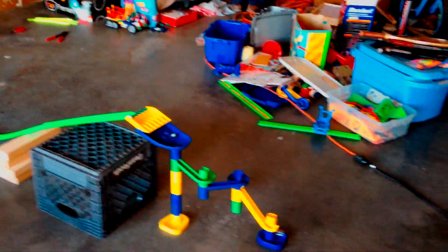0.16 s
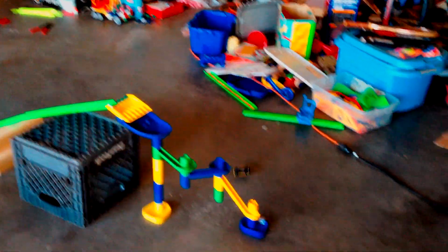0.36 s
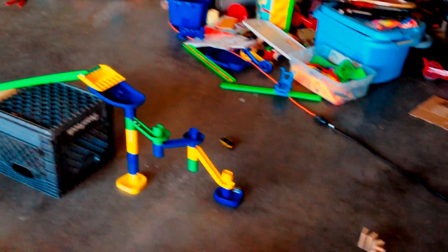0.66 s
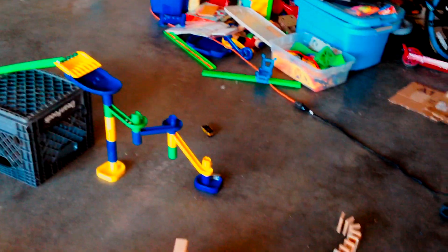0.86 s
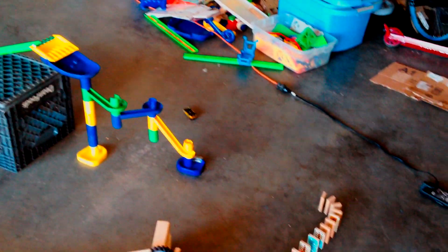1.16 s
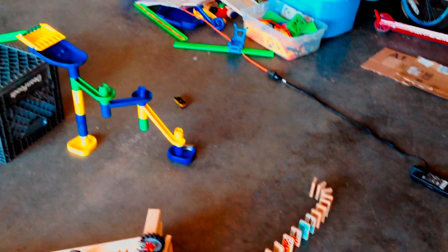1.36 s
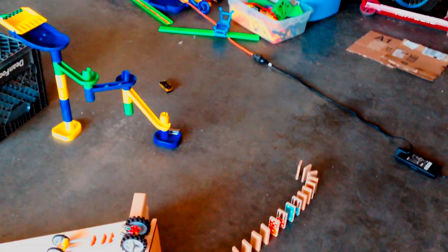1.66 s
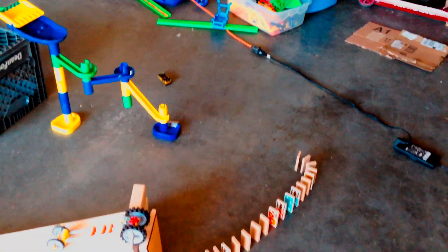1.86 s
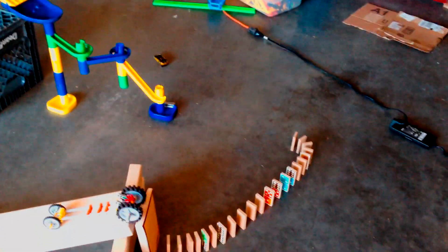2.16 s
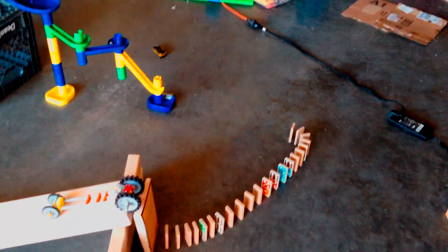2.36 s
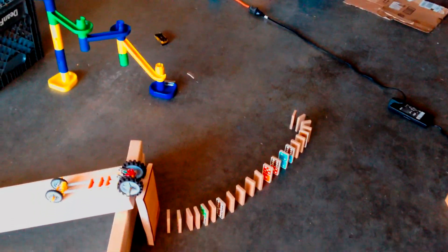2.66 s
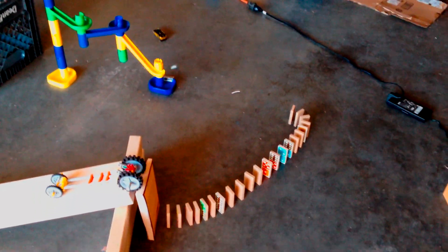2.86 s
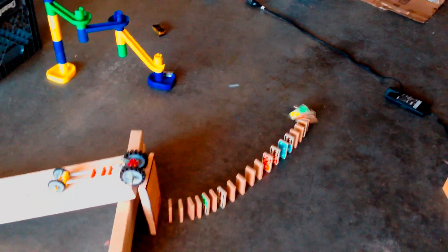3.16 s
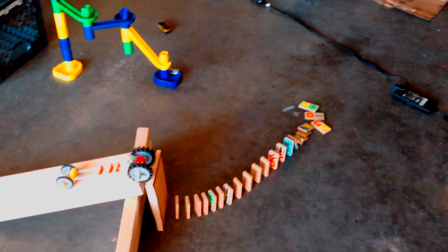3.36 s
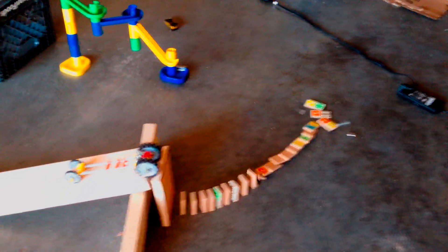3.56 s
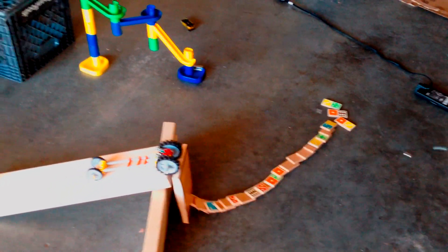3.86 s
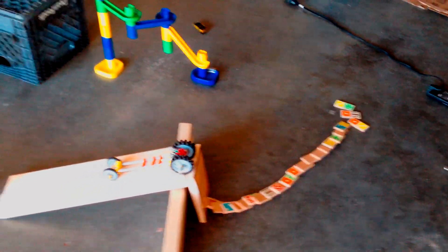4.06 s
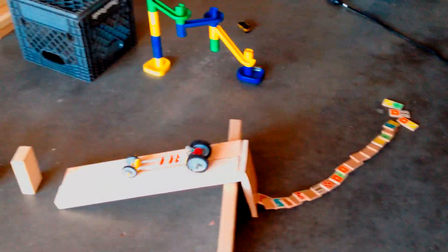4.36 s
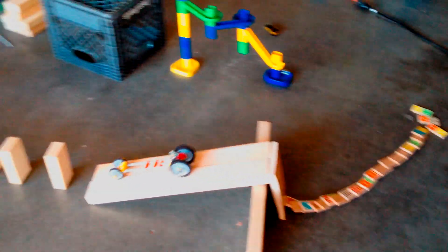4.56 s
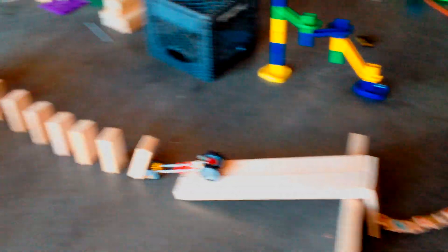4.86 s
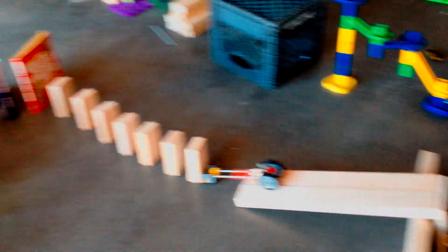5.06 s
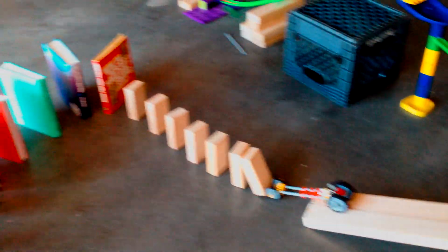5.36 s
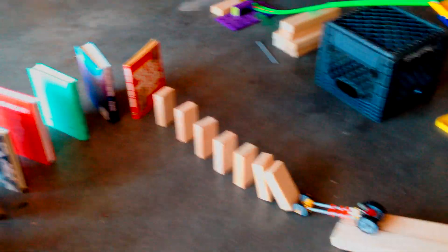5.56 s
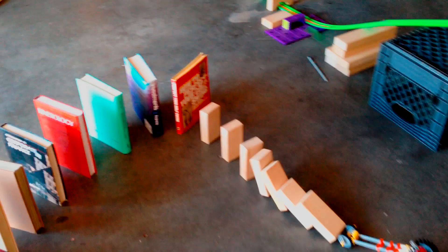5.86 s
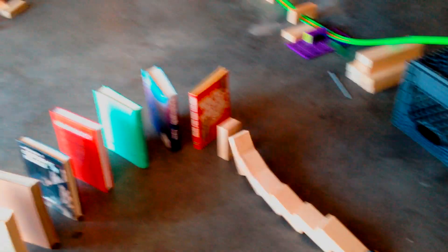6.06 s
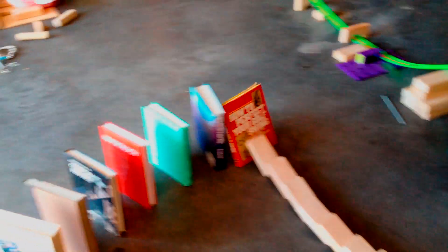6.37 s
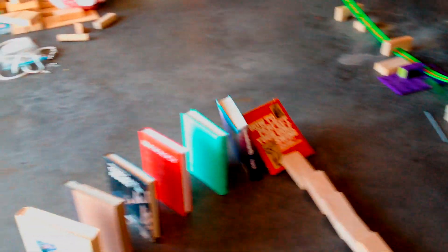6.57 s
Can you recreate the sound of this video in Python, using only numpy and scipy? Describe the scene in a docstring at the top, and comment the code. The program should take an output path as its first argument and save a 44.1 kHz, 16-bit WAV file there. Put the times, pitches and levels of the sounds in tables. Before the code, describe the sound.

A toy chain reaction on a concrete garage floor: marbles rattle in plastic, hit the floor with hard ticks, and dominoes fall in a crisp slithering cascade. After a sparse pause with a few cart knocks and faint rolling, wooden blocks topple with dry, loud clacks that bunch together, ending in a low hollow book thump. Handheld phone, slightly dull top, short room reverberation and faint steady hiss.

```python
"""Glass marbles drop and roll through a plastic run, starting a toy chain reaction in a garage: dominoes topple,
a cart rolls down a plank, wooden blocks and a book fall over, and a prop and loose parts knock.
Each thing is a set of resonances, struck by single blows and, except the prop and loose parts,
also driven by a random rattle of small contacts. Decaying noise bands give the echoes of the garage;
shaped noise gives its steady hush. A phone thins the bass and cuts the top."""
import sys
import numpy as np
from scipy import signal
from scipy.fft import rfft, irfft
from scipy.io import wavfile

SR = 44100
rng = np.random.default_rng(int(sys.argv[2]) if len(sys.argv) > 2 else 0)


def master_out(mix):
    """Clip the mix to full scale and print it as 16-bit PCM to the path in sys.argv[1]."""
    frames = np.transpose(np.atleast_2d(mix))
    ceiling = np.clip(frames, -1, 1)
    pcm = np.round(ceiling * 32767).astype(np.int16)
    wavfile.write(sys.argv[1], SR, pcm)


def ratio(d):
    """dB to gain"""
    e = np.asarray(d, float) / 20
    return 10 ** e


N = 296793  # samples
TIME = np.arange(N) / SR  # s


def split(rows, s):
    """Events in sequence: the rows before a moment, and those from it on."""
    before = [row for row in rows if row[0] < s]
    after = [row for row in rows if row[0] >= s]
    return before, after


def tilt(hz, hard_db):
    """Contact stiffness: harder contacts favour the high resonances; below 1 kHz the tilt is flat."""
    octaves = np.log2(np.maximum(hz, 1000) / 2000)
    return ratio(hard_db * octaves)


def walk(t, knots_per_s=6):
    """Slow random modulation: straight lines between normal draws, spread near 1."""
    knots = np.arange(t[0], t[-1] + 1, 1 / knots_per_s)
    return np.interp(t, knots, rng.standard_normal(len(knots)))


def resonate(push, t, hz, width):
    """Heterodyned resonance: shift down, smooth, shift back; pitch and strength drift with the contact point."""
    wander_share, wander_db = .012, 2.5  # spread of the pitch as a share, and of the strength
    r = np.exp(-np.pi * width / SR)
    turn = 2 * np.pi * hz / SR  # radians per sample
    spin = np.exp(1j * turn * np.cumsum(1 + wander_share * walk(t)))
    edges = signal.lfilter([1, 0, -1], [1], push)
    held = signal.lfilter([1], [1, -r], edges / spin)
    ring = np.imag(held * spin * np.exp(1j * turn)) / np.sin(turn)
    return ratio(wander_db * walk(t)) * (1 - r) * ring


def add(out, s, modes, peak_db, hard_db, crack_db):
    """Impulse response: trios of close rings swell during the contact and beat as they die, under a short crack."""
    contact_s, crack_s = .0008, .001
    hz, width, db = np.repeat(modes, 3, axis=0).T[:, :, None]
    t = TIME[:int(3 * SR / width.min())]  # until the narrowest ring has died
    spot = rng.standard_normal((3,) + hz.shape)  # no two blows land on the same spot
    hz = hz * np.exp(0.38 * width / (hz + width) * spot[0])
    size = ratio(db + 2 * spot[1]) * width * tilt(hz, hard_db)
    rings = size * np.exp(-np.pi * width * t) * np.sin(2 * np.pi * hz * t + .8 * spot[2])
    ring = rings.sum(axis=0) * (1 - np.exp(-(t / contact_s) ** 2))
    noise = np.resize(rng.standard_normal(1024), len(t) + 1)
    crack = np.diff(noise) * np.exp(-t / crack_s)
    crack_gain = ratio(crack_db + hard_db) * 3
    blow = ring / np.abs(ring).max() + crack_gain * crack / np.abs(crack).max()
    part = out[int(s * SR):][:len(t)]  # a view, so out itself grows
    part += ratio(peak_db) / np.abs(blow).max() * blow[:len(part)]


def blows(rows, modes, crack_db, main_hz=None):
    """Scaling of modes: one kind of object is struck, and each piece shifts the resonances with its size."""
    out = np.zeros(N)
    for s, peak_db, hard_db, *ring_hz in rows:
        shift = ring_hz[0] / main_hz if ring_hz else 1
        add(out, s, np.array(modes) * [shift, 1, 1], peak_db, hard_db, crack_db)
    return out


def rattle(spells, modes, per_s, spread_db, fade_db_per_s):
    """Random excitation of resonances by many faint and a few strong contacts; spells add as powers."""
    rise_db = 27.5  # the level climbs by this much during the rise
    lumps_per_s, lump_db = 45, 2  # contacts come in uneven bunches
    s, rise, hold, db, hard_db = np.transpose(spells)[:, :, None]
    start = int(max(s.min() - .2, 0) * SR)
    end = int((s + hold).max() * SR + .3 * SR)
    span = slice(start, end)
    t = TIME[span]
    grid = t[::32]  # coarse times for the slow envelopes
    rise_loss = rise_db * np.maximum(s - grid, 0) / np.maximum(rise, .001)
    fade_loss = fade_db_per_s * np.maximum(grid - s - hold, 0)
    shape = ratio(db - rise_loss - fade_loss)

    luck = rng.random((2, N))[:, span]
    touch = np.clip((per_s - luck[0] * SR) / 20, 0, 1)
    strength = np.minimum(-np.log(1 - luck[1]), 3)
    force = touch * ratio(spread_db * strength + lump_db * walk(t, lumps_per_s))
    parts = []
    for hz, width, mode_db in modes:
        push = force * rng.uniform(-0.81, 1, len(t))
        parts.append(ratio(mode_db) * resonate(push, t, hz, width))

    mix = 0
    for part, mode in zip(parts, modes):
        power = np.sum((shape * tilt(mode[0], hard_db)) ** 2, axis=0)
        mix = mix + part * np.interp(t, grid, np.sqrt(power))
    out = np.zeros(N)
    out[span] = mix / np.std(sum(parts))
    return out


def level(x, db):
    """Root-mean-square scaling to a level in dB."""
    return x * ratio(db) / np.sqrt(np.mean(x ** 2))


def air():
    """Stationary coloured noise: the steady hush of the room and the microphone."""
    # spectrum of the hush: (frequency [Hz], relative density [dB per Hz])
    hush = [(25, -39), (80, 4), (170, 2), (300, -4), (700, -2.5), (1200, -7.5), (3000, -18), (9500, -21)]
    hz, db = np.transpose(hush)
    bins = np.maximum(np.fft.rfftfreq(N, 1 / SR), 1)
    gain = ratio(np.interp(np.log(bins), np.log(hz), db))
    noise = irfft(rfft(rng.standard_normal(N)) * gain, N)
    return level(noise, -58.5)


def garage(x):
    """Diffuse reverberation: dense echoes from concrete and clutter, each octave dying at its own pace."""
    wet_db, wall_gap_s = -5.5, .003
    # reverberation times: (octave centre [Hz], time to fall 60 dB [s])
    decays = [(125, 0.14), (250, 0.56), (500, 0.34), (1000, 0.43), (2000, 0.4), (4000, 0.28), (8000, 0.28)]
    t = TIME[:SR]
    echo = 0
    for hz, t60 in decays:
        edges = [hz / np.sqrt(2), hz * np.sqrt(2)]
        band = signal.butter(2, edges, "bandpass", fs=SR, output="sos")
        echo = echo + signal.sosfilt(band, rng.standard_normal(len(t))) * ratio(-60 * t / t60)
    echo = echo * (1 - np.exp(-(t / wall_gap_s) ** 2))  # walls answer after a short gap
    echo = ratio(wet_db) * echo / np.sqrt(np.sum(echo ** 2))
    return x + signal.fftconvolve(x, echo)[:N]


def knocks():
    """Free vibration after impact: the hollow knock of the prop on the floor and tiny ticks of loose parts."""
    # ticks: (time [s], peak [dB], hardness [dB per octave], main ring [Hz])
    tick_blows = [(4.515, -32.5, 9, 4000), (4.615, -35, -1, 4550), (4.7572, -12, 19, 3800),
                  (6.33, -33, 18.5, 4100), (6.342, -33, 12, 4300), (6.483, -36.5, -15, 3900)]
    # resonances of loose parts, then of the prop: (frequency [Hz], width [Hz], strength [dB])
    tick_modes = [(2010, 120, -15), (4000, 490, 3.5), (6900, 2400, 10.5)]
    prop_modes = [(420, 90, -6), (540, 130, 4), (598, 16, 9), (790, 80, -4), (1080, 90, 0)]
    out = blows(tick_blows, tick_modes, -31.5, main_hz=4000)
    add(out, 3.845, prop_modes, peak_db=-21.5, hard_db=0, crack_db=-28)
    return out


def book():
    """Plate and cavity modes: the hard cover booms when struck; friction scrapes the floor as the book leans over."""
    # scrapes: (full from [s], rise [s], hold [s], level [dB], hardness [dB per octave])
    scrapes = [(6.425, 0.011, 0.058, -48, -4), (6.69, 0.21, 0.0079, -49, 1.5),
               (6.708, 0.011, 0.014, -27.5, -2.5)]
    # resonances of the scraping book, then of its hollow cover: (frequency [Hz], width [Hz], strength [dB])
    book_modes = [(421, 310, -10), (1400, 220, -2.5), (2120, 230, -5), (4130, 1600, -6.5),
                  (7500, 2500, -12.5)]
    cover_modes = [(215, 45, 4), (323, 45, 4), (452, 4, 15), (510, 70, 4), (740, 130, 5), (1200, 600, -12)]
    # the last block lands on it, it rocks, it hits the next book: (time [s], peak [dB])
    cover_blows = [(6.206, -17.5), (6.422, -36.5), (6.707, -15.5)]
    out = rattle(scrapes, book_modes, per_s=2054, spread_db=3.9, fade_db_per_s=250)
    for s, peak_db in cover_blows:
        add(out, s, cover_modes, peak_db, 0, -25)
    return out


def cart():
    """Rolling contact: knobbly wheels patter down the plank; the cart knocks its stopper, the plank and the ledge."""
    # rolling: (full from [s], rise [s], hold [s], level [dB], hardness [dB per octave])
    rolling = [(4.316, 0.0048, 0.0078, -49, 2), (4.407, 0.0038, 0.0046, -41.5, 1.5),
               (4.5, 0.49, 0.33, -51, -1), (4.756, 0.0092, 0.014, -40, 5)]
    # resonances of the cart and the three things it knocks: (frequency [Hz], width [Hz], strength [dB])
    cart_modes = [(382, 330, -1), (1504.4, 810, -8.5), (2255, 210, 1), (3700, 860, -9), (7660, 520, -16.5)]
    stopper = [(1180, 160, -9.5), (1720, 220, -4), (2600, 60, 4), (3100, 110, -8)]
    plank = [(890, 20, 11), (2300, 300, 0), (2880, 90, 5), (3500, 200, -1), (4970, 200, 3), (7500, 400, -5)]
    ledge = [(746, 110, -4), (1600, 590, 6), (2076, 160, 3), (3530, 2100, 4)]
    out = rattle(rolling, cart_modes, per_s=1610, spread_db=3.2, fade_db_per_s=260)
    # time [s], peak [dB], thing
    for s, peak_db, thing in (4.316, -21.5, stopper), (4.405, -14.5, plank), (4.75, -23.5, ledge), (4.755, -17.5, ledge):
        add(out, s, thing, peak_db, 0, -22)
    return out


def blocks():
    """Collision and friction of solid bars: wooden blocks clack into each other and scrape down."""
    # block against block: (time [s], peak [dB], hardness [dB per octave], main ring [Hz])
    clacks = [(5.252, -25.5, -1.5, 3750), (5.278, -36, -5, 3700), (5.302, -39, -8.5, 3700),
              (5.683, -12, 2, 3700), (5.81, -13.5, -1, 3810), (5.845, -15.5, -0.5, 3900),
              (5.917, -9, -0.5, 4000), (5.931, -22, -8, 3930), (5.949, -14, 2.5, 4000),
              (5.962, -20.5, -9, 3800), (6.013, -0.5, 0.5, 3800), (6.027, -19, 1, 3700),
              (6.067, -15, -6, 3700), (6.081, -12.5, -2, 3800), (6.105, -3.5, 1.5, 3860),
              (6.118, -5, 6.5, 3785), (6.157, -17, 1, 3750), (6.167, -13.5, -1, 3750),
              (6.181, -25, 2, 3750), (6.221, -16, -7.5, 3880), (6.242, -22, -9, 3930)]
    # scrapes: (full from [s], rise [s], hold [s], level [dB], hardness [dB per octave])
    scrapes = [(6.03, 0.1, 0.059, -49, 3.5), (6.12, 0.038, 0.091, -33, -10.5),
               (6.25, 0.033, 0.012, -52, -7)]
    # resonances of a block: (frequency [Hz], width [Hz], strength [dB])
    block_modes = [(280, 49, 1), (775, 360, 5.5), (1243, 270, 14.5), (1488, 230, 16), (1995, 400, 15),
                   (2483, 430, 10.5), (2960, 620, 2), (3750, 84, 10.5), (5750, 1500, -1),
                   (6850, 880, -10.5)]
    scraping = rattle(scrapes, block_modes, per_s=600, spread_db=4, fade_db_per_s=250)
    return blows(clacks, block_modes, -30, main_hz=3750) + scraping


def dominoes():
    """Damping of a strong mode: hard tiles click and slither down the row; further along they ring drier."""
    # tile against tile: (time [s], peak [dB], hardness [dB per octave], main ring [Hz])
    clicks = [(3.097, -16, -0.5, 4320), (3.2178, 3.5, 7.5, 4360), (3.2225, -6, 19.5, 4500),
              (3.242, -10, 3, 4230), (3.255, -11, 3.5, 4390), (3.2598, -10.5, -2, 4600),
              (3.273, -5.5, 5, 4320), (3.283, -13, -1.5, 4770), (3.321, -10, 4, 4360),
              (3.332, -6.5, 4, 4370), (3.35, -6.5, 5, 4400), (3.366, -12, -0.5, 4500),
              (3.428, -18, 5, 4360), (3.4675, -6.5, 7, 4340), (3.5115, -15.5, -5, 4460),
              (3.555, -16, 0, 4350), (3.5668, 2, 20, 4070), (3.588, -14.5, -1, 4280),
              (3.622, -13.5, -13, 4300), (3.657, -16, -8, 4130), (3.75, -19, -1, 4370),
              (3.78, -19, 7, 4330), (3.809, -22.5, -18, 4000), (3.819, -22, -2, 4300),
              (3.845, -9.5, 15, 4240), (3.917, -11.5, 15, 4470), (3.868, -26.5, 2, 4300),
              (3.976, -25.5, 12, 4600)]
    # slithering: (full from [s], rise [s], hold [s], level [dB], hardness [dB per octave])
    slides = [(3.1, 0.0088, 0.0085, -32.5, -1.5), (3.225, 0.02, 0.06, -34, 8.5),
              (3.337, .005, 0.051, -26.5, -2), (3.4, .02, 0.036, -31, 0),
              (3.47, 0.0092, 0.0075, -28.5, 1.5), (3.53, 0.037, .13, -28.5, -3),
              (3.7, 0.035, 0.15, -33.5, -3.5), (3.92, .01, 0.0072, -30.5, -33), (3.98, .03, 0.17, -56.5, 1)]
    # resonances of a near tile: (frequency [Hz], width [Hz], strength [dB])
    near = [(2110, 670, 1), (3310, 1300, 3), (4400, 56, 17.5), (4573, 120, 6.5), (3930, 500, 5),
            (6800, 1200, -1.5), (8500, 600, -0.5)]
    far = np.array(near) * [1, 2.4, 1]  # wider resonances die sooner
    main_hz, far_tiles_s = 4400, 3.46  # the fall then reaches the lower tiles
    near_clicks, far_clicks = split(clicks, far_tiles_s)
    near_slides, far_slides = split(slides, far_tiles_s)
    out = blows(near_clicks, near, -12, main_hz) + blows(far_clicks, far, -12, main_hz)
    out += rattle(near_slides, near, per_s=1200, spread_db=2.1, fade_db_per_s=240)
    out += rattle(far_slides, far, per_s=1300, spread_db=2, fade_db_per_s=160)
    return out


def marbles():
    """Impact and rolling noise: marbles clack at each drop, circle the funnel, then rumble down hollow chutes."""
    # drops: (time [s], peak [dB], hardness [dB per octave])
    drops = [(0.1425, -11.5, 10), (0.252, -12.5, 10), (0.370, -5.5, 7), (0.426, -17, 2), (0.491, -8.5, 3.5),
             (0.646, -25, -4), (0.709, -25, -4), (0.934, -38, -12), (1.3555, -11.5, 0.5), (1.449, -17, 1),
             (2.299, -28, 3), (2.324, -14.5, 9), (2.5805, -22.5, 2), (2.8, -7, 18), (2.807, -23.5, -12.5),
             (2.816, -27.5, 23), (3.04, -26, -18.5), (3.047, -15.5, 10.5), (3.055, -20.5, 20),
             (3.063, -8, 10.5)]
    # rolling: (full from [s], rise [s], hold [s], level [dB], hardness [dB per octave])
    rolling = [(0.0, 0.016, 0.013, -27, 5), (0.05, 0.099, 0.39, -49.5, -17),
               (0.254, 0.0045, 0.0022, -35, 10.5), (0.374, 0.017, 0.0017, -30.5, 10.5),
               (0.44, 0.018, 0.027, -33.5, 0), (0.491, 0.0033, 0.089, -27.5, -1.5),
               (0.58, 0.039, 0.099, -33, -3), (0.715, 0.018, 0.0064, -31, -5), (0.76, .05, 0.77, -47, -8.5),
               (0.94, 0.0077, 0.0032, -37, -2.5), (1.09, .05, 0.037, -45, 2),
               (1.325, 0.0085, 0.029, -31, -0.5), (1.36, 0.0063, 0.033, -28.5, 0),
               (1.44, 0.039, 0.027, -25.5, 0.5), (1.62, 0.1075, 0.664, -50.5, -8.5),
               (2.327, 0.016, 0.0023, -25, -1), (2.43, 0.044, 0.12, -54.5, -16),
               (2.55, 0.15, 0.003, -36, -2), (2.583, 0.0053, 0.012, -26.5, -1),
               (2.7, 0.044, 0.13, -47, -14), (2.8, 0.05, 0.0056, -39, 7.5), (3.06, 0.092, 0.06, -42, 2)]
    # resonances of the funnel, then of the hollow chutes: (frequency [Hz], width [Hz], strength [dB])
    funnel_modes = [(301, 24, -10), (736, 120, -10), (1205, 83, 8), (1544, 194, 7), (1996, 330, 8),
                    (2600, 200, -4.5), (3750, 520, -0.5), (4600, 450, -6), (6570, 610, -8.5),
                    (8020, 390, -7.5)]
    chute_modes = [(298, 36, -5.5), (755, 200, -8), (1120, 110, 5), (1289, 64, 5.5), (1515, 190, 4),
                   (1817, 70, 14.5), (2030, 140, 6.5), (2200, 180, 3), (2587, 64, 6), (3750, 500, -0.5),
                   (4600, 300, -4), (3136, 120, -1.5), (6800, 1100, -13)]
    chutes_s = 1.3  # the marbles leave the funnel
    funnel_drops, chute_drops = split(drops, chutes_s)
    funnel_roll, chute_roll = split(rolling, chutes_s)
    out = blows(funnel_drops, funnel_modes, -10) + blows(chute_drops, chute_modes, -6.5)
    out += rattle(funnel_roll, funnel_modes, per_s=2000, spread_db=1.4, fade_db_per_s=490)
    out += rattle(chute_roll, chute_modes, per_s=1500, spread_db=2.2, fade_db_per_s=220)
    return out


def scene():
    """Superposition: the toys with their echoes, over the hush of the garage."""
    toys = knocks() + book() + cart() + blocks() + dominoes() + marbles()
    return (garage(toys) + air())[None]


def band_limit(x):
    """A steep low-pass at the top of the band."""
    return signal.sosfilt(signal.butter(12, 10330, fs=SR, output="sos"), x)


def record(dry):
    """Band limiting: the phone thins the bass and cuts the top steeply."""
    bass_cut = signal.butter(3, 140, "highpass", fs=SR, output="sos")
    top_cut = signal.ellip(9, .5, 55, 9300, fs=SR, output="sos")
    thin = signal.sosfilt(bass_cut, dry)
    return band_limit(signal.sosfilt(top_cut, thin))


dry = scene()
out = record(dry)
master_out(out)
```